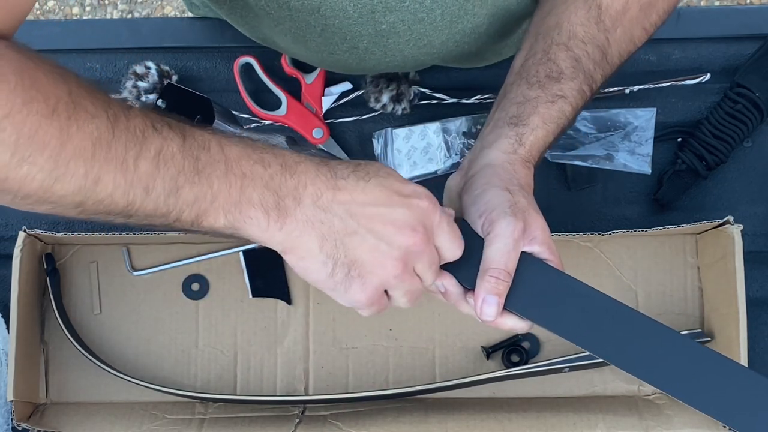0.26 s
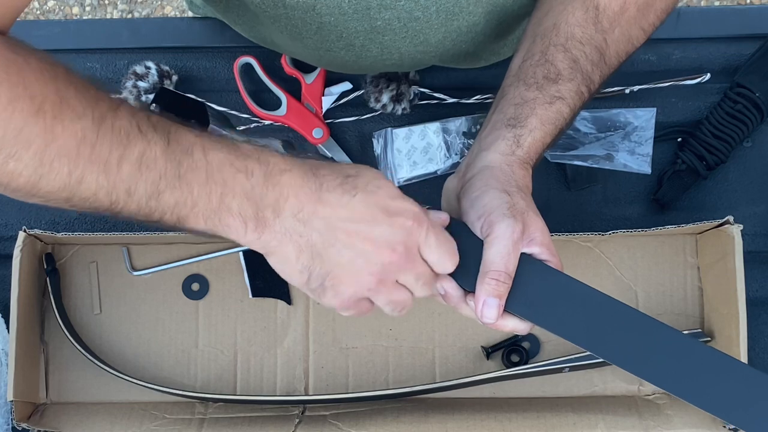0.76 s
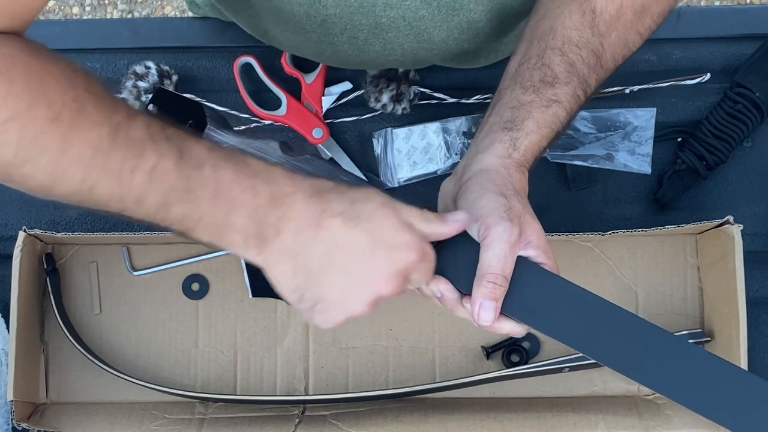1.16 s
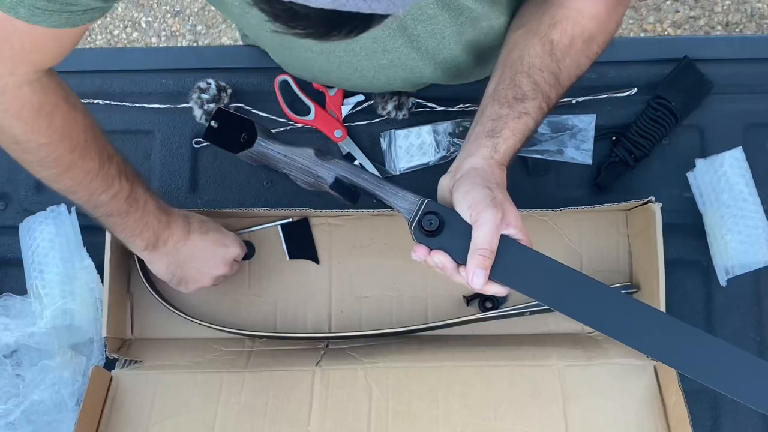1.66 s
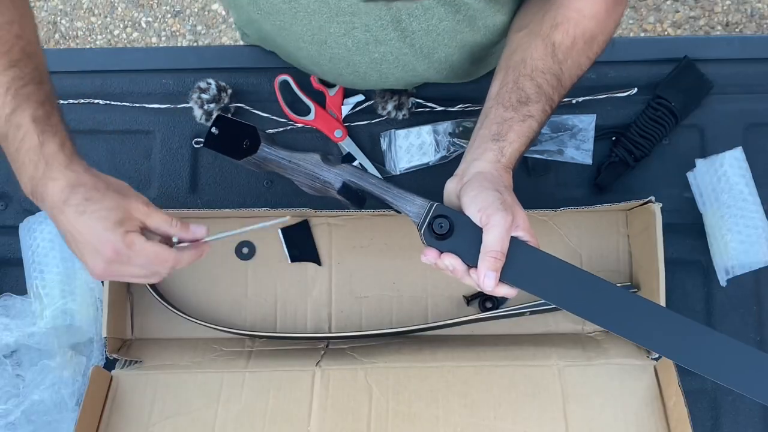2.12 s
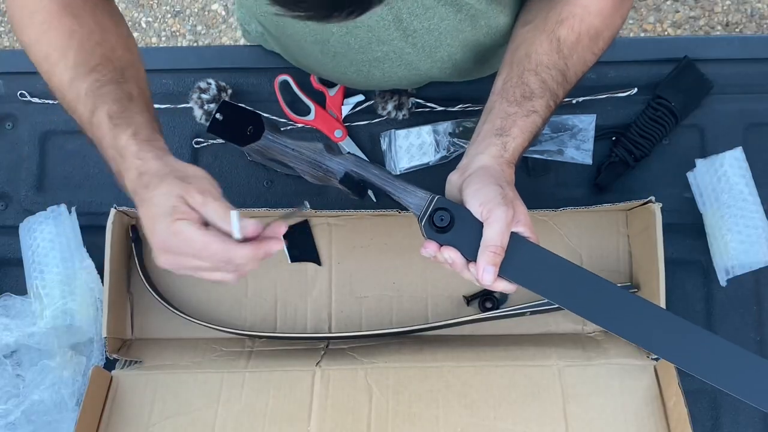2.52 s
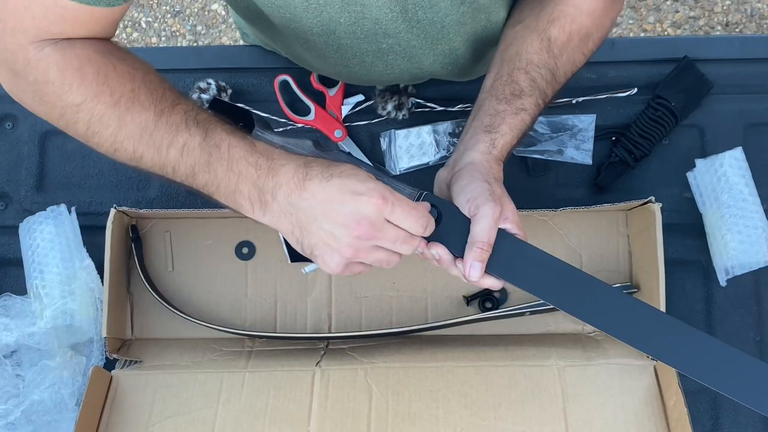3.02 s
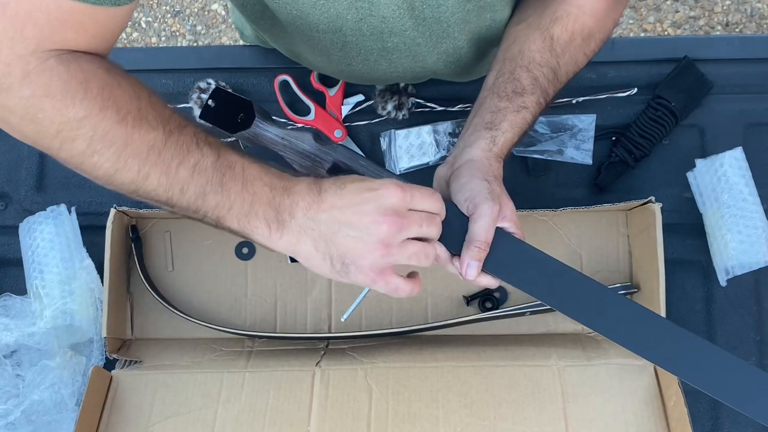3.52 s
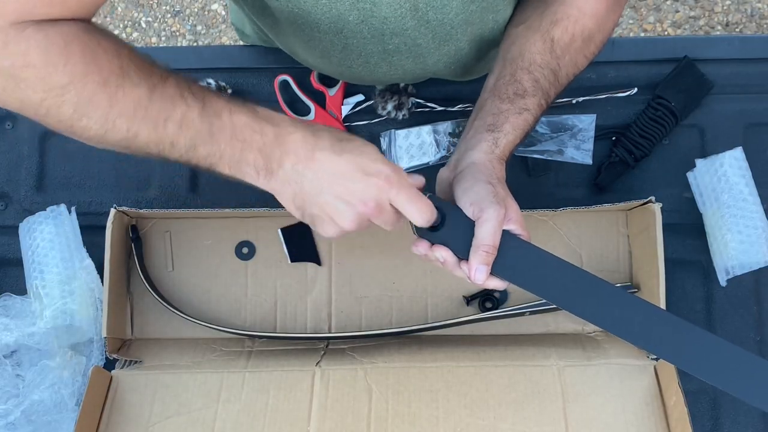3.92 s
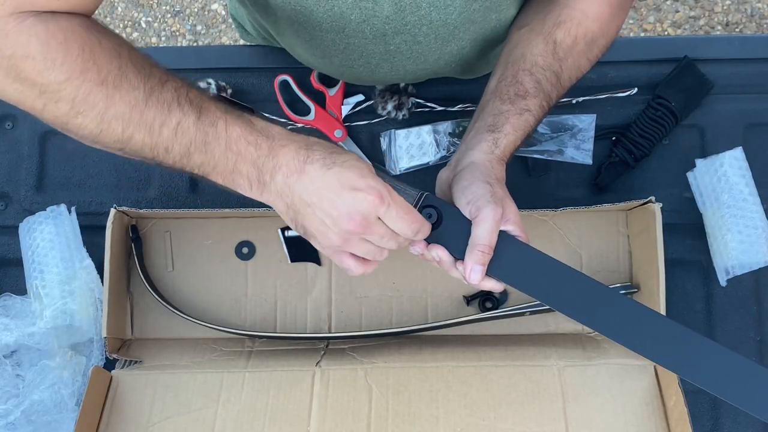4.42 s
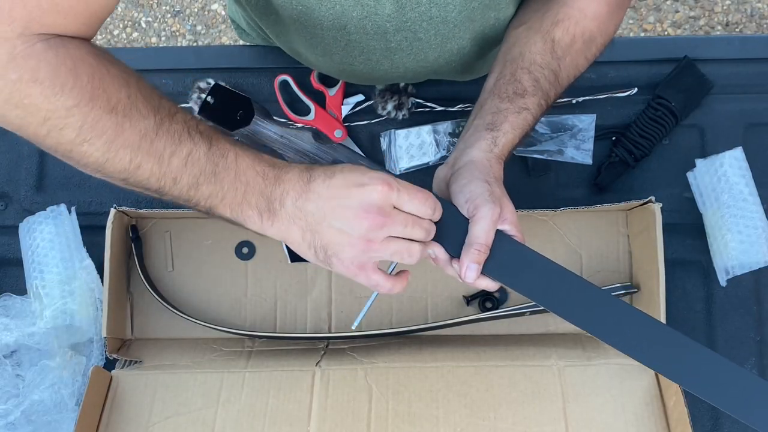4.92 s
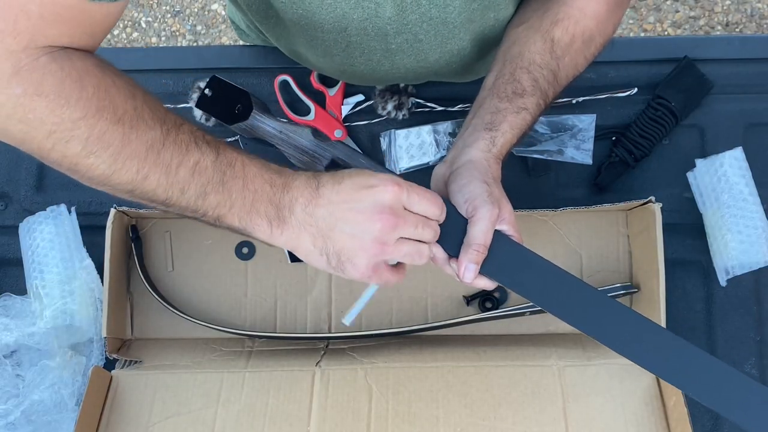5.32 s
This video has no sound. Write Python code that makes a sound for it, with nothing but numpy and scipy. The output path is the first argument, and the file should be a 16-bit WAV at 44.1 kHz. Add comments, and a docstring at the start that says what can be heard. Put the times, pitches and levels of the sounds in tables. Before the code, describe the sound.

Close, sparse metal ticks and fingertip taps on a cardboard box, with a low hum and a far engine rising as it leaves outdoors.

```python
"""An idling engine, a low hum and far traffic come first, then the rub and click of steel close by.
Hands set a bolt into a bow handle and turn it with a steel hex key, just under a phone held overhead:
bursts of blows ring metal modes, and uneven noise grains feed resonances as skin and thread rub.
Fingers scrabble on a cardboard box, ringing its card modes. Far off, filtered noise makes the traffic;
wavering tones make the hum, an engine droning past and the idling one, which pulls away, rising."""
import sys
import numpy as np
from scipy import signal
from scipy.fft import rfft, irfft, next_fast_len
from scipy.io import wavfile
from scipy.ndimage import uniform_filter1d, map_coordinates

SR = 44100
rng = np.random.default_rng(int(sys.argv[2]) if len(sys.argv) > 2 else 0)


def unload_wav(signal):
    """Save mono or channel-first audio to the path in sys.argv[1] as 16-bit WAV at rate SR, clipped to [-1, 1]."""
    wavfile.write(
        sys.argv[1],
        SR,
        np.round(np.clip(np.atleast_2d(signal).T, -1, 1) * 32767).astype(np.int16),
    )


def level_to_linear(level):
    """Convert decibel levels to linear amplitude factors, elementwise."""
    exponent = np.asarray(level, float) / 20
    return 10 ** exponent


N = 245725

# metal contacts; the last three are rings against the contact: start_s, level_db, handle_db, shank_db, tip_db
CONTACTS = [(0.2984, -43, 3.5, 5.5, -7), (0.3313, -56.5, -13.5, 5.5, -10.5), (0.3501, -69, -9, 15, -9),
            (0.4524, -59.5, -2, -5, -22), (0.843, -55.5, 0.5, -12, -41), (0.8508, -68.5, 17.5, 1, -23),
            (1.0407, -63.5, 18, 2, -7.5), (3.0028, -34.5, -17, -25, -9.5),
            (3.0037, -35.5, -12.5, -25, -3.5), (3.0327, -66.5, -0.5, 7, -7.5), (3.0754, -43.5, -2, 8, 7.5),
            (3.0767, -46, 4.5, 6, 6), (3.7672, -66.5, 4.5, 0, -17.5), (4.5438, -36.5, -13, -12.5, -19.5),
            (4.5851, -63, 10, -23, -19.5), (4.656, -68, -3, -20, -33.5), (4.802, -72, -6, -7, -21),
            (4.8396, -51, -3, -3, -10.5), (4.8458, -45, 0.5, -21.5, -15.5), (5.2031, -65.5, 9.5, -23, -23)]
# modes of bolt, key and handle: pitch_hz, level_db, t60_s
STEEL_MODES = [(1648, 0, .03), (1920, 0.5, 0.014), (2047, -1, 0.022), (2574, 2, 0.027), (2964, -8, 0.024),
               (3270, 7, 0.012), (3650, 0.5, 0.024), (4340, -13, 0.047), (5020, -5, 0.017),
               (5720, 3, 0.011), (5780, 3.5, 0.015), (6640, -3.5, 0.016), (7230, 0.5, 0.018),
               (7340, -11, 0.022), (7250, -28, .14), (7500, -26, .15), (8120, -8.5, 0.025),
               (9100, -8.5, 0.015), (9730, -12, 0.018), (10700, -18.5, 0.017), (3700, 1, 0.0017),
               (12920, -16, 0.0038)]
# where handle, bolt (low and high end), shank, socket and tip ring: pitch_hz
PARTS_HZ = [1750, 2400, 3350, 3900, 5700, 8000]
# fingertips on the box: start_s, level_db, panel_hz, thump_db, tick_db
FINGER_TAPS = [(1.3975, -32, 1283, -18, -12.5), (1.409, -35.5, 985, -10, -19), (1.419, -41, 1330, -8, -20),
               (1.482, -58.5, 634, -7, 4), (1.511, -33.5, 1516, -16.5, -32.5),
               (1.586, -33.5, 820, -23.5, -14.5), (1.594, -35.5, 660, -16.5, -27),
               (1.598, -40, 730, -1, -29), (1.613, -44.5, 610, -6, -28), (1.629, -50.5, 770, -10.5, -6),
               (1.639, -48.5, 956, 0.5, -6.5)]
# card under the finger: ratio to panel_hz, level_db, t60_s
PANEL_MODES = [(1.024, 2.5, 0.019), (1.5, -1.5, 0.01), (0.733, -2, 0.019), (.5, -8, 0.017),
               (0.29, -12, 0.038), (2.4, -11, 0.0085)]
# box wall modes: pitch_hz, level_db, t60_s
WALL_MODES = [(199, -4, 0.1), (296, -7.5, 0.15), (477, -4, 0.055), (660, -6.5, 0.035)]
# tick on the card surface: pitch_hz, level_db, t60_s
TICK_MODES = [(2240, -15, 0.009), (2540, -0.5, 0.01), (3870, -13.5, 0.0087), (4320, -7, 0.0038),
              (5800, -20, 0.0053), (8060, -13, 0.0068)]
# skin and thread on the bolt; rise and fall span 20 dB: peak_s, rise_s, fall_s, level_db, brightness_db
THREAD_RUBS = [(.09, 0.03, 0.11, -74.5, -11), (.17, 0.069, 0.079, -69, -14),
               (.34, 0.075, 0.068, -71.5, -15), (.385, 0.02, 0.036, -59, 7.5), (.408, .045, 0.034, -55, -3),
               (.455, 0.043, 0.12, -73, -4.5), (.64, .12, 0.033, -79.5, -18),
               (.745, 0.16, 0.053, -79.5, -10.5), (.82, 0.067, .04, -79.5, -12),
               (.849, .008, 0.023, -67, -22), (.872, 0.01, .045, -60.5, -9.5),
               (.886, 0.011, 0.05, -61, 7.5), (.955, 0.029, 0.064, -74, 8.5), (.997, 0.021, 0.055, -65, -5),
               (3.0, 0.011, 0.0034, -70, -4.5), (3.034, 0.014, .02, -77, -18),
               (3.068, 0.013, .012, -55.5, -15.5), (3.125, 0.024, 0.084, -84.5, -1),
               (4.595, .03, 0.054, -71.5, -17), (4.66, .015, .03, -80, -15), (4.803, 0.014, .025, -67, -18),
               (4.83, 0.049, 0.023, -76, -23), (5.209, 0.017, 0.035, -73, -14)]
# fingers sliding on card; rise and fall span 20 dB: peak_s, rise_s, fall_s, level_db, brightness_db
CARD_SCRAPES = [(1.417, 0.022, 0.064, -60.5, 0.5), (1.445, .04, 0.018, -63, 3),
                (1.487, 0.029, 0.041, -67.5, 0.5), (1.514, 0.012, 0.02, -57, 0.5),
                (1.54, 0.068, .1, -66.5, -8), (1.574, 0.017, 0.023, -64.5, -2),
                (1.587, .01, 0.024, -56.5, -6), (1.636, 0.035, 0.067, -72.5, -4.5)]
# low, middle and high resonances that rubbing feeds, as one pass: pitch_hz, width_hz, level_db
DRAG_PEAKS = [(1330, 244, -2.5), (1524, 320, -2), (2174, 830, -6.5)]
RASP_PEAKS = [(2516, 460, 1), (3083, 220, 3), (3503, 280, 2), (4070, 420, -2.5), (4570, 470, -5.5)]
HISS_PEAKS = [(5000, 400, -4), (5550, 250, 0), (6090, 380, -2), (6930, 420, -2.5), (7590, 300, -3),
              (8410, 350, -5), (8870, 400, -6), (10100, 1100, -9)]
# engine idling, then pulling away: time_s, firing_hz, level_db
LEAVING_ENGINE = [(0.0, 73.6, -56), (0.39, 74.9, -55.5), (0.51, 76.5, -49.5), (0.9, 78.5, -56),
                  (1.37, 79.8, -54), (1.63, 77, -58.5), (1.95, 79.5, -56), (2.07, 81.8, -55),
                  (2.22, 82.3, -51), (2.6, 89.9, -42.5), (2.89, 91.0, -43), (3.45, 93.2, -40.5),
                  (3.74, 94.3, -37), (3.91, 95.1, -40.5), (4.35, 96.2, -41.5), (4.8, 97.4, -46),
                  (5.25, 97.7, -42.5), (5.57, 97.7, -49.5)]
# its overtones as they surface from the traffic: peak_s, rise_s, fall_s, order, level_db
LEAVING_OVERTONES = [(2.1, 0.17, 0.14, 8 / 3, -62.5), (2.619, 0.25, .5, 3.0, -62),
                     (2.9, 0.49, .7, 7 / 3, -65.5), (2.9, 0.48, 1.1, 3.97, -65.5),
                     (3.401, 1.7, 0.38, 10 / 3, -64), (3.8, 0.62, 0.32, 3.0, -62),
                     (3.85, 0.69, 0.49, 3.9, -65.5), (4.402, 0.2, 0.84, 3.0, -62),
                     (4.801, .6, 1.4, 8 / 3, -66), (5.3, 0.64, .5, 3.5, -62), (5.45, 0.98, 1.5, 3.0, -63.5),
                     (5.2, 1.5, 1.1, 7 / 3, -68.5)]
# tones of the engine that drones past: order, level_db
PASSING_ORDERS = [(2.371, -65.5), (3, -62.5), (4.001, -66.5), (5.85, -68.5)]
# low hum: time_s, pitch_hz, level_db
HUM_COURSE = [(0.0, 120.1, -60.5), (0.35, 119.1, -56), (1.3, 119.1, -56.5), (1.7, 120.6, -59),
              (2.1, 121.5, -66), (2.65, 121.9, -64), (2.9, 121.9, -80), (3.8, 121.6, -80),
              (4.1, 122.6, -68.5), (4.9, 123.1, -62), (5.2, 121.1, -70.5), (5.57, 121.1, -70)]
# traffic spectrum, relative: pitch_hz, level_db (per Hz)
TRAFFIC_SPECTRUM = [(12, -53.5), (25, -28), (40, -11), (55, 1), (75, -3), (123, -10), (168, -16.5),
                    (260, -15.5), (367, -19), (420, -24), (718, -21), (1400, -35.5), (1860, -38.5),
                    (2500, -53.5), (6000, -61.5), (16000, -74.5)]
# traffic swell, relative: time_s, level_db
TRAFFIC_SWELL = [(0.0, -65), (0.4, -63.5), (1.75, -65), (3.3, -63), (4.69, -62), (5.57, -62)]
# stereo of near and far sound: pitch_hz, side_over_mid_db, share tied to mid (0-1), its phase_rad
NEAR_STEREO = [(300, -19, .5, 1), (700, -8, 0.45, 1), (1200, -7, .3, .5), (1710, -14, .2, 2),
               (2200, -7.5, 0.73, 2.2), (2550, -1, 0.58, 1.7), (3200, -2.5, 0.36, 2.6), (3870, 0, 1, 1.5),
               (4720, 0, 0.28, 1.9), (5270, -0.5, .4, 2), (6000, -8.5, 0.94, 2), (6760, -4, 0.84, 1.4),
               (8200, -2, .9, 1.4), (11000, 6.5, 0.97, 1.5), (13500, 15.5, .5, 1.5)]
FAR_STEREO = [(183, -24.5, 0, 3.5), (352, -4.5, 0.7, 1.1), (524, 0.5, 0.3, 0.7), (676, 3, 0.8, 0.44),
              (1040, 3, 0, 5.5), (1320, 3.5, 0.4, -9), (2030, -1.4, 0.9, 1.7), (2550, 7.5, 0, 0.5),
              (3470, 0.5, 0.06, 4), (4500, 2.5, 0.5, 3.7), (5500, -3.5, 0.06, 2.5), (7100, -0.5, 0.1, 1.4),
              (9000, 1.5, 0.3, 1.5), (11000, 2, 0.8, 1.5)]


def clicks():
    """Each contact is a crack and a short chatter that rings handle, bolt and key, by where it lands."""
    bolt_db, socket_db, socket_follows = -8, -8, 0.28  # the socket rings with a share of the tip's dB
    crack_db, crack_t60_s = -12, 0.013
    mode_hz = np.transpose(STEEL_MODES)[0][:, None]
    t = np.arange(SR // 20) / SR
    rings, cracks = np.zeros(N + SR), np.zeros(N + SR)
    for s, db, handle, shank, tip in CONTACTS:
        parts_db = [handle, bolt_db, bolt_db, shank, socket_db + socket_follows * tip, tip]
        lift_db = np.interp(mode_hz, PARTS_HZ, parts_db)
        add(rings, s, struck(STEEL_MODES, lift_db, spread_s=0.0011, attack_s=0.00033), db + 2)
        crack = rng.standard_normal(len(t)) * level_to_linear(-60 * t / crack_t60_s)
        add(cracks, s, crack, db + crack_db)
    return rings[:N] + resonant(cracks[:N], DRAG_PEAKS + RASP_PEAKS)


def rubbing():
    """Skin, thread, card and the ring-off of contacts: dense uneven grains feed three resonance groups."""
    thread_drag_db, card_drag_db = -6, 4  # low drag against the rasp
    dulling = 0.25  # dB the drag gains for each dB of lost brightness
    rounded = 1.09  # stroke shape: 1 = pointed, 2 = bell
    ring_off_db, ring_off_bright_db, ring_off_lag_s, ring_off_fall_s = -26.5, -1, 0.008, 0.024

    flutter_db = 1.5 * wobble(400)  # shared by all bands
    bands = []
    for peaks in (DRAG_PEAKS, RASP_PEAKS, HISS_PEAKS):
        grains = rng.standard_normal(N) * level_to_linear(flutter_db + 2.2 * wobble(60))
        bands.append(unit(resonant(resonant(grains, peaks), peaks)))  # two passes narrow the peaks

    # a short noisy ring-off follows each contact
    ring_off = [(s + ring_off_lag_s, ring_off_lag_s / 2, ring_off_fall_s,
                 db + ring_off_db, ring_off_bright_db + tip / 2) for s, db, _, _, tip in CONTACTS]
    power = np.zeros((3, N))
    for strokes, drag_db in ((THREAD_RUBS + ring_off, thread_drag_db), (CARD_SCRAPES, card_drag_db)):
        for s, rise_s, fall_s, db, bright_db in strokes:
            band_gain = level_to_linear(db + np.array([drag_db - dulling * bright_db, 0, bright_db]))
            power += band_gain[:, None] ** 2 * swell(s, rise_s, fall_s, rounded) ** 2
    return (np.sqrt(power) * np.array(bands)).sum(axis=0)


def taps():
    """A fingertip rings a small panel of card, thumps the box wall and ticks on the surface."""
    track = np.zeros(N + SR)
    for s, db, panel_hz, thump_db, tick_db in FINGER_TAPS:
        panel_modes = np.multiply(PANEL_MODES, [panel_hz, 1, 1])
        panel = struck(panel_modes, 0, spread_s=0.0016, attack_s=0.00019)
        thump = struck(WALL_MODES, thump_db + 6.5, spread_s=0.0013, attack_s=0.0012)
        tick = struck(TICK_MODES, tick_db + 10.5, spread_s=0.0013, attack_s=0.00026)
        add(track, s, panel + thump + tick, db - 4.5)
    return track[:N]


def near_tail(x):
    """Box and truck bed give back a short tail: decaying noise, about 3 ms late."""
    t = np.arange(SR // 4) / SR
    tail = rng.standard_normal(len(t)) * level_to_linear(-60 * t / 0.11)
    return signal.fftconvolve(np.pad(x, (130, 0)), tail / np.linalg.norm(tail))[:N]


def leaving_engine():
    """A firing tone idles, then rises as the engine pulls away, with overtones that come and go."""
    hz, db = curves(LEAVING_ENGINE)
    overtones = [(order, level_to_linear(top_db) * swell(s, rise_s, fall_s, rounded=1.78))
                 for s, rise_s, fall_s, order, top_db in LEAVING_OVERTONES]
    firing = wavering_tones(hz, [(1, level_to_linear(db))], waver_db=0.54, drift_hz=0.3)
    return firing + wavering_tones(hz, overtones, waver_db=0.5, drift_hz=0.3)


def passing_engine():
    """A second engine drones past: a few orders of a slowly climbing rate swell and fade together."""
    peak_s, rise_s, fall_s = 0.87, 1, 0.88
    peak_hz, climb_hz_per_s = 91.15, 3.5
    passing = swell(peak_s, rise_s, fall_s, rounded=1.14)
    hz = peak_hz + climb_hz_per_s * (np.arange(N) / SR - peak_s)
    voices = [(order, level_to_linear(db) * passing) for order, db in PASSING_ORDERS]
    return wavering_tones(hz, voices, waver_db=1.0, drift_hz=0.29)


def low_hum():
    """One low tone whose level and pitch wander."""
    hz, db = curves(HUM_COURSE)
    return wavering_tones(hz, [(1, level_to_linear(db))], waver_db=1.84, drift_hz=0.7)


def traffic():
    """A wash of tyres and far engines: shaped noise, patchy in time and pitch."""
    z = signal.stft(rng.standard_normal(N), nperseg=1024)[2]
    patches = uniform_filter1d(rng.standard_normal(z.shape), 5, 0)
    patches = uniform_filter1d(patches, 8, 1)
    wash = signal.istft(z * level_to_linear(1.2 * unit(patches)), nperseg=1024)[1][:N]
    shaped = filtered(wash, lambda hz: level_to_linear(along(TRAFFIC_SPECTRUM, hz)[0]))
    return level_to_linear(curves(TRAFFIC_SWELL)[0] + 11.5) * unit(shaped)


def ports(x, table, blur_s):
    """Two close microphone ports: the side is part phase-shifted mid, part scattered by things nearby."""
    t = np.arange(round(blur_s * SR)) / SR
    blur = rng.standard_normal(len(t)) * level_to_linear(-30 * t / blur_s)
    scattered = signal.fftconvolve(x, blur / np.linalg.norm(blur))[:N]

    def side_response(hz):
        db, share, phase = along(table, hz)
        share = np.clip(share, 0, 1)
        return level_to_linear(db) * np.array([share * np.exp(1j * phase), np.sqrt(1 - share ** 2)])

    side = filtered(np.array([x, scattered]), side_response).sum(axis=0)
    return np.array([x + side, x - side])


def struck(modes, lift_db, spread_s, attack_s):
    """Modes rung by a 10 ms burst of tiny fading blows; each mode ends near its own strength."""
    t = np.arange(SR // 8) / SR
    burst_t = t[:SR // 100]
    blows = rng.standard_normal(len(burst_t)) ** 3 * np.exp(-burst_t / spread_s)
    blows[0] = 3  # a firm first blow
    hz, db, t60 = np.transpose(modes)[:, :, None]
    # pitch share and dB differ from strike to strike
    chance = rng.standard_normal((len(modes), 2)) * [0.005, 1.5]
    hz = hz * (1 + chance[:, :1])
    # how strongly the burst drives each mode, with a floor, is divided out
    driven = np.abs(np.exp(2j * np.pi * hz * burst_t) @ blows)[:, None]
    driven = driven + 0.2 * np.linalg.norm(blows)
    decay = level_to_linear(db + lift_db + chance[:, 1:] - 60 * t / t60)
    ring = decay * np.sin(2 * np.pi * hz * t) / driven
    return np.convolve(ring.sum(axis=0) * (1 - np.exp(-t / attack_s)), blows)


def wavering_tones(hz, voices, waver_db, drift_hz):
    """Sines at orders of a drifting rate, as (order, rms gain), each wavering in level."""
    turns = 2 * np.pi * np.cumsum(hz + drift_hz * wobble(5)) / SR
    total = np.zeros(N)
    for order, gain in voices:
        start_phase = 2 * np.pi * rng.random()
        total += np.sqrt(2) * gain * level_to_linear(waver_db * wobble(9)) * np.sin(order * turns + start_phase)
    return total


def swell(s, rise_s, fall_s, rounded):
    """Gain that climbs 20 dB to its peak at s in rise_s and drops as much in fall_s."""
    t = np.arange(N) / SR - s
    return level_to_linear(-20 * np.where(t < 0, -t / rise_s, t / fall_s) ** rounded)


def resonant(x, peaks):
    """x through parallel resonances, alternating in sign."""
    def response(f):
        total = 0
        for k, (centre, width, db) in enumerate(peaks):
            damping = 1j * f * width
            total = total + (-1) ** k * level_to_linear(db) * damping / (centre * centre - f * f + damping)
        return total

    return filtered(x, response)


def filtered(x, response):
    """x times a complex response of frequency."""
    m = next_fast_len(N + SR // 2)
    return irfft(rfft(x, m) * response(np.fft.rfftfreq(m, 1 / SR)), m)[..., :N]


def wobble(rate):
    """A smooth random curve, rate knots a second."""
    knots = rng.standard_normal(int(N * rate / SR) + 4)
    return map_coordinates(knots, [np.arange(N) * rate / SR])


def along(points, hz):
    """Columns of (Hz, ..) points, read on a log axis."""
    f, *cols = np.transpose(points)
    return [np.interp(np.log(hz + 1), np.log(f + 1), c) for c in cols]


def curves(rows):
    """One value per sample for each column after the time."""
    s, *cols = np.transpose(rows)
    return [np.interp(np.arange(N) / SR, s, c) for c in cols]


def unit(x):
    """Scaled to rms 1."""
    return x / np.sqrt(np.mean(x ** 2) + 1e-20)


def add(track, s, sound, db):
    """Lays a sound on the track at time s with gain db."""
    track[round(s * SR):][:len(sound)] += level_to_linear(db) * sound


def scene():
    """Hands close under the phone, the street far off."""
    hits = clicks() + taps()
    near = hits + level_to_linear(-14.5) * near_tail(hits) + rubbing()
    far = traffic() + leaving_engine() + passing_engine() + low_hum()
    return ports(near, NEAR_STEREO, blur_s=0.006) + ports(far, FAR_STEREO, blur_s=0.15)


def top_cut(x):
    """Nothing passes above the cut-off."""
    return signal.sosfilt(signal.butter(12, 16440, fs=SR, output="sos"), x)


def record(dry):
    """The finished two-port mix as the phone keeps it."""
    return top_cut(dry)


dry = scene()
out = record(dry)
unload_wav(out)
```